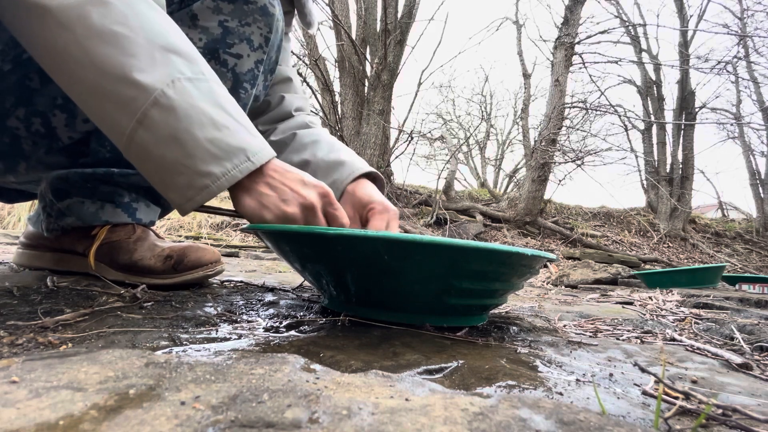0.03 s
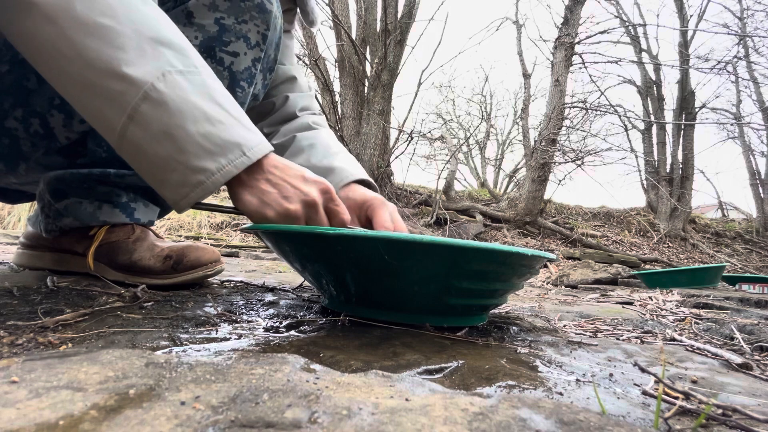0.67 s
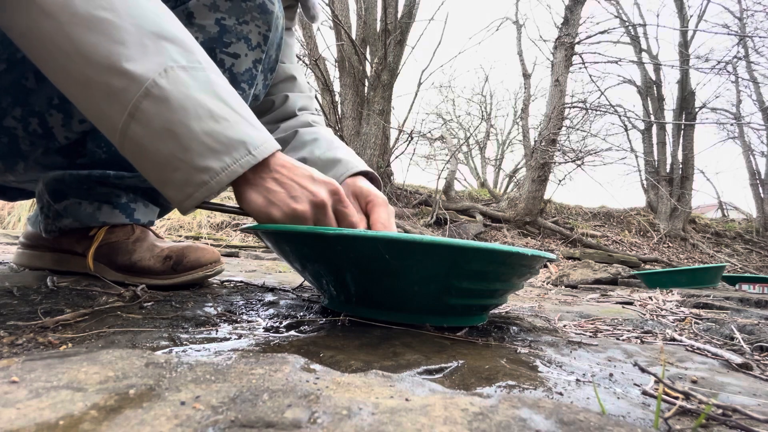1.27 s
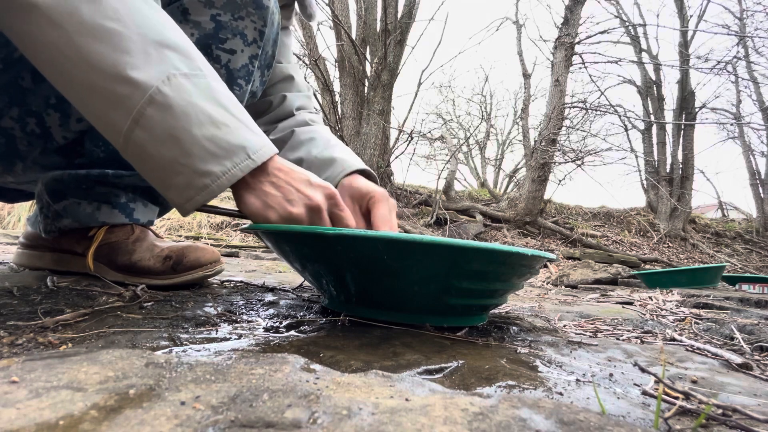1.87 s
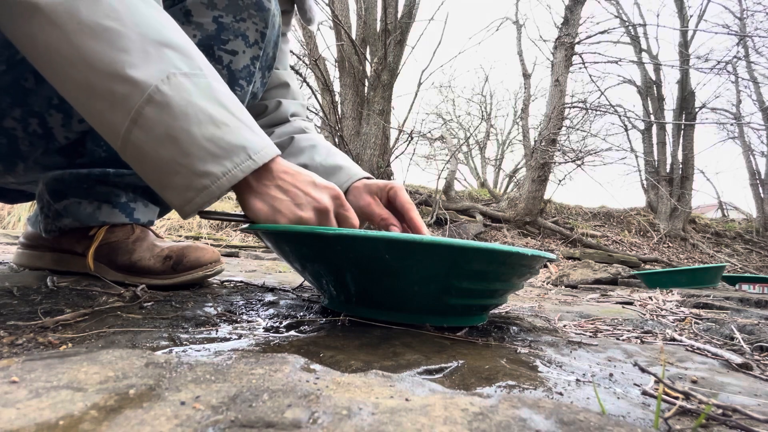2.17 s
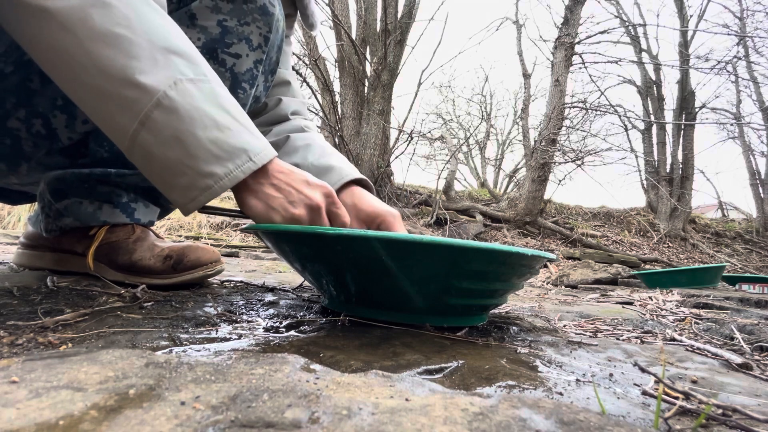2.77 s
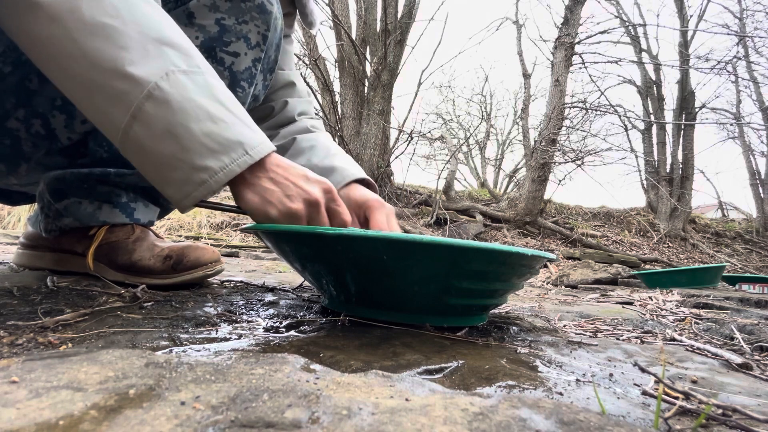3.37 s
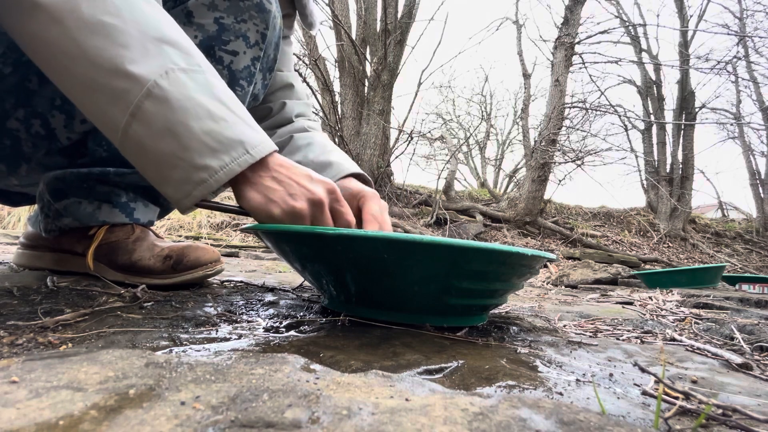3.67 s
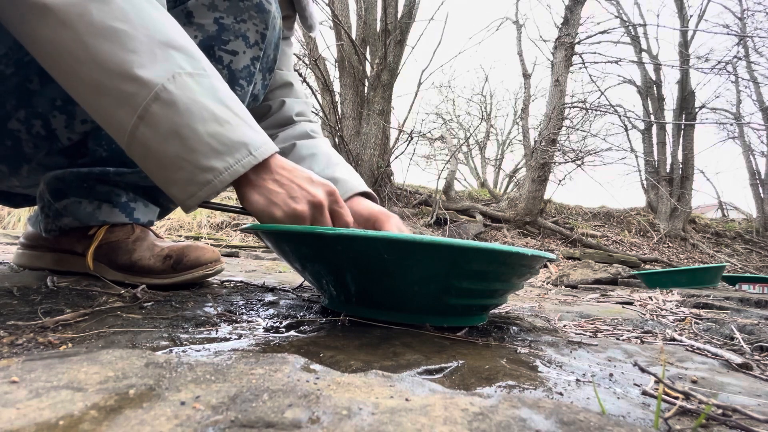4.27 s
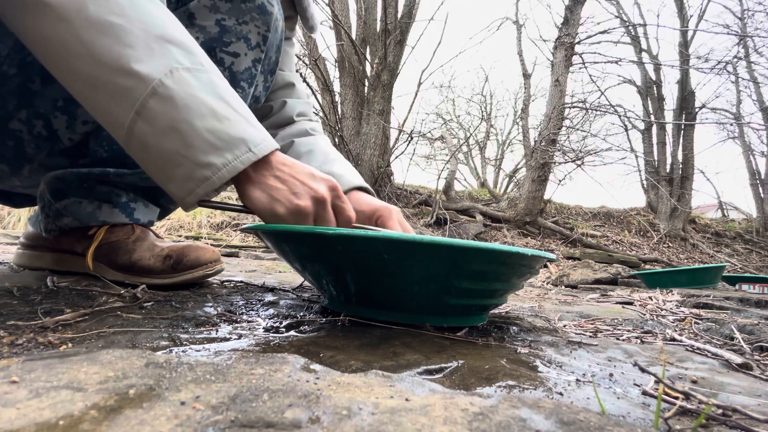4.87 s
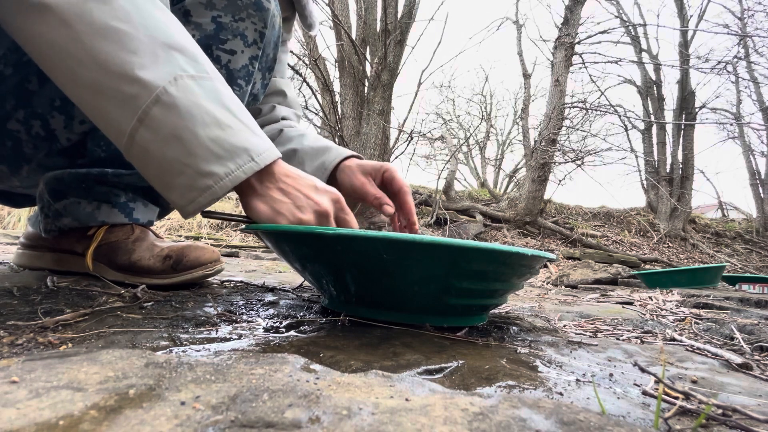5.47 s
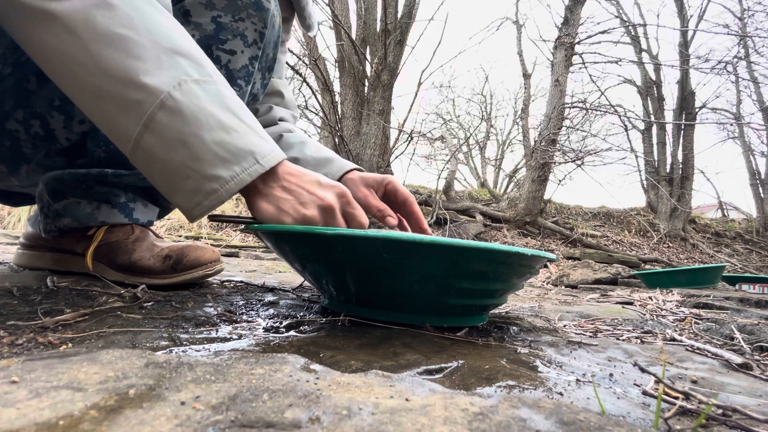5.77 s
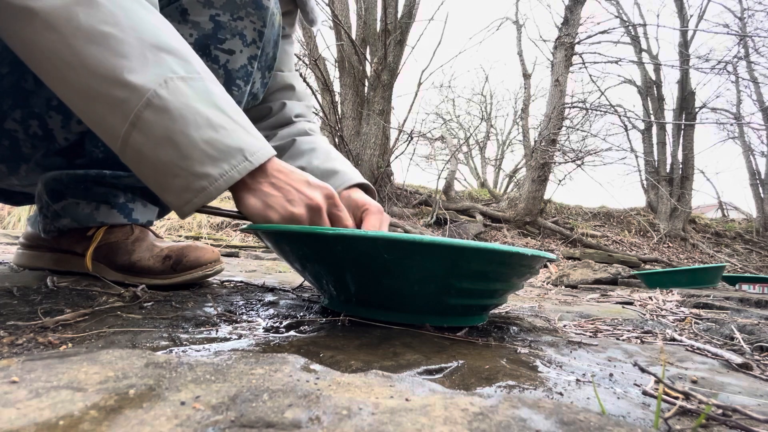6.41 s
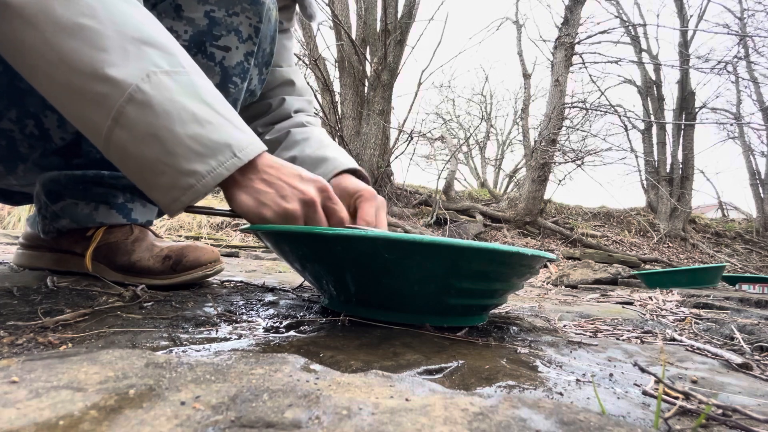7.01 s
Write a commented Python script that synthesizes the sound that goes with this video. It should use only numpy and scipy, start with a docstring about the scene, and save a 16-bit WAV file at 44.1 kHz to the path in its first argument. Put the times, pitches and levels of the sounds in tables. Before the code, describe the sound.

Hands rub and scrub wet gravel in a plastic pan, pebbles clicking, while a heavy vehicle passes behind.

```python
"""Wet gravel in a pan by the road

Two hands rub wet gravel round a plastic pan outdoors: slow strokes and two bursts of quick scrubbing.
Single pebbles click and knock the pan, and one bubble chirps. Behind them a heavy vehicle passes:
its engine drops in pitch, its tyres swell and fade. Two closely spaced microphone ports listen."""
import sys
import numpy as np
from scipy import signal
from scipy.fft import rfft, irfft, next_fast_len
from scipy.io import wavfile
from scipy.ndimage import uniform_filter1d, map_coordinates

SR = 44100
rng = np.random.default_rng(int(sys.argv[2]) if len(sys.argv) > 2 else 0)


def generate_wav(signal):
    """Clip the signal to [-1, 1] and save it as 16-bit WAV at the path in sys.argv[1]."""
    frames = np.transpose(np.atleast_2d(signal))
    scaled = np.clip(frames, -1, 1) * 32767
    pcm = np.round(scaled).astype(np.int16)
    wavfile.write(sys.argv[1], SR, pcm)


N = 319725
TIME = np.arange(N) / SR
SPEED_M_PER_S, CLOSEST_M, ABREAST_S = 26, 19, 2.15  # the vehicle's straight path

# Table levels are relative; the functions set the final balance.
# hand strokes: t/s, level/dB, half length/s, lean (+ sudden start, - sudden end)
STROKES = [(0.164, -48, 0.055, -0.52), (0.33, -48.5, 0.052, -0.35), (0.46, -48.9, 0.037, -0.14),
           (0.605, -45.5, 0.038, -0.12), (0.729, -47.5, 0.04, -0.025), (0.868, -47, 0.067, 0.052),
           (1.087, -56, 0.027, 0.27), (1.173, -47.5, 0.059, 0.32), (1.406, -46.9, 0.047, -0.094),
           (1.517, -51.5, 0.054, 0.63), (1.608, -51, 0.056, -0.045), (1.74, -48.5, 0.097, -0.04),
           (1.911, -48.1, 0.048, -0.06), (1.996, -44.5, 0.033, 0.28), (2.1, -42, 0.034, 0.13),
           (2.189, -46, 0.038, 0.25), (2.296, -43.2, 0.033, 0.2), (2.388, -41, 0.03, 0.18),
           (2.509, -42, 0.038, -0.04), (2.601, -40.5, 0.032, 0.1), (2.705, -42, 0.036, 0.09),
           (2.89, -49, 0.066, -0.15), (3.136, -50.5, 0.059, -0.55), (3.27, -48, 0.049, 0.05),
           (3.458, -48, 0.055, -0.16), (3.596, -49.5, 0.06, 0.39), (3.804, -45.5, 0.055, -0.065),
           (3.981, -46, 0.055, -0.36), (4.14, -46, 0.065, -0.14), (4.322, -51.1, 0.072, 0.2),
           (4.593, -53, 0.11, -0.048), (4.792, -49, 0.041, 0.31), (4.935, -51, 0.071, 0.53),
           (5.133, -54.5, 0.059, 0.24), (5.352, -50.7, 0.065, -0.69), (5.427, -42.3, 0.033, 0.41),
           (5.534, -43, 0.033, 0.19), (5.64, -43.5, 0.036, 0.026), (5.738, -41, 0.035, -0.0099),
           (5.842, -40.5, 0.034, 0.022), (5.94, -42, 0.037, 0.13), (6.043, -40, 0.036, -0.0062),
           (6.142, -50.5, 0.025, -0.077), (6.286, -54.5, 0.091, 0.37), (6.538, -49.5, 0.062, -0.13),
           (6.709, -50, 0.077, -0.11), (6.873, -50.5, 0.046, -0.11), (6.979, -53.1, 0.044, -0.17)]
# gravel that keeps shifting between strokes: t/s, level/dB
SHIFTING = [(0, -60.5), (.9, -59), (1.03, -69), (1.3, -58), (2, -58), (3, -56.5), (4, -56.5), (5.3, -56.5),
            (6.1, -61), (6.45, -66), (7.04, -61), (7.11, -66), (7.25, -71)]
# bright rasp of stone on stone: f/Hz, level/dB
GRIT_SPECTRUM = [(900, -11.5), (1700, -2), (2500, -4.5), (3400, -4), (4400, -4.5), (5200, -7), (6200, -2.5),
                 (7200, -7), (8500, -4), (10400, 1), (11800, -6.5), (12700, -16), (13600, -41),
                 (15500, -31)]
# the pan's dull answer to the rubbing: f/Hz, level/dB
PAN_SPECTRUM = [(150, -14), (400, 3.5), (750, 1.5), (1300, -38), (2500, -33)]
# featured pebbles: t/s, ring level/dB, f/Hz, crack level/dB, crack t60/s
LOUD_PEBBLES = [(.044, -41, 3100, -42, .009), (.448, -35, 2700, -34, .03), (1.086, -38, 6200, -34, .012),
                (1.152, -36, 9900, -29, .009), (1.189, -28, 4950, -31, .009),
                (1.225, -27, 11300, -22, .011), (1.414, -31, 2900, -29, .025),
                (1.425, -33, 5200, -25.5, .016), (2.191, -19, 1500, -32, .009),
                (2.244, -34, 3950, -38, .009), (2.624, -22, 2300, -26, .03),
                (2.733, -30.5, 4350, -34, .009), (2.864, -36, 4300, -35, .02),
                (2.894, -35, 8500, -27, .015), (2.94, -40, 9900, -32, .009), (3.221, -37, 4480, -38, .009),
                (3.588, -27, 6200, -26, .014), (3.936, -31, 3800, -30, .012), (4.652, -35, 6300, -26, .013),
                (6.311, -42, 9900, -34, .009), (6.335, -42, 6300, -34, .009), (6.756, -40, 8500, -30, .012),
                (6.975, -35, 3300, -33, .009), (6.990, -23.5, 1850, -19, .006),
                (6.999, -37, 3550, -42, .009), (7.017, -45, 4300, -36, .009), (7.047, -42, 9500, -36, .009),
                (7.091, -38, 10000, -29, .009)]
# stones that knock the pan: t/s, level/dB
KNOCKS = [(5.383, -27), (5.953, -23)]
# one bubble in the wet gravel: t/s, ring level/dB, starting f/Hz, rise/(Hz/s), t60/s, splash level/dB
BUBBLE = (4.076, -28, 1830, 62000, .066, -43)

# how each part of the vehicle radiates, from -90 deg coming to 90 deg leaving: base level/dB,
# loss per doubling of distance/dB, rear gain/dB, beam gain/dB, beam angle/deg, beam width/deg
RADIATION = {"rumble": (-31, 5.5, 6, 9, -57.5, 27), "exhaust": (-39.5, 7.5, -2, 16, 66.5, 31.5),
             "roar": (-30, 8, -1, 8, 76, 7), "hiss": (-32.5, 4, 5, 6, -62.5, 36),
             "tread": (-37.5, 7.5, 6, 1, 47, 21), "sweep": (-43.5, 4, 5.5, 1, -24, 21),
             "whoosh": (-37.5, 10.5, 3.5, 15, 71.5, 18)}
# engine harmonics: order of the cycle rate, level coming/dB, level abreast/dB, level leaving/dB
ENGINE_ORDERS = [(4, -41.5, -56, -41.5), (5, -38, -35.5, -48.5), (6, -60, -48, -40), (7, -41, -73, -44),
                 (8, -37.5, -53, -43), (10, -48, -47.5, -42.5), (13, -59, -72, -54.5),
                 (16, -49.5, -43.5, -54.5)]
# an order booms where its reflections add up: t/s, order, level/dB, half length/s
BOOMS = [(0.486, 4, -37.5, 0.14), (0.858, 8, -33, 0.42), (1.294, 5, -35, 0.89), (1.51, 10, -32.5, 0.14),
         (2.35, 4, -32.5, 0.48), (2.85, 5, -33, 0.41)]
# low end of the vehicle's body: f/Hz, level/dB
RUMBLE_SPECTRUM = [(22, -42), (38, -27), (55, 1.5), (85, 0), (135, -2.5), (220, -11), (300, -17),
                   (500, -37.5), (1500, -92)]
# exhaust drone: f/Hz, level/dB
EXHAUST_SPECTRUM = [(70, -14), (125, -4.5), (180, 1), (240, -3), (300, -9.5), (420, -43), (900, -82)]
# tyre roar, heard close by: f/Hz, level/dB
ROAR_SPECTRUM = [(150, -17), (300, -7), (450, -4), (560, -6.5), (650, -5), (800, -1), (1200, -11),
                 (2000, -46), (5000, -69)]
# tyre hiss, which carries far: f/Hz, level/dB
HISS_SPECTRUM = [(300, -22.5), (600, -11), (780, -8), (930, 1.5), (1200, -1.5), (1600, -7.5), (1850, -11.5),
                 (2200, -16.5), (3000, -25), (5000, -32.5), (11000, -55), (14000, -81)]
# hum of the tread: f/Hz, level/dB
TREAD_SPECTRUM = [(400, -58), (560, -12), (630, -1.5), (680, 1), (760, -7.5), (1000, -69)]
# midrange sizzle of the tyres: f/Hz, level/dB
SIZZLE_SPECTRUM = [(900, -62), (1300, 4), (1600, 7.5), (1850, 6), (2150, -14), (3000, -48)]
# swells of that sizzle: t/s, level/dB
SIZZLE_LEVEL = [(0, -60), (.3, -51), (.85, -48), (1.3, -58), (2, -47.5), (2.5, -41.5), (2.7, -45),
                (2.86, -38), (3.12, -41), (3.32, -50), (4.1, -44), (5.2, -50.5), (5.85, -46), (6.3, -49),
                (7.25, -50.5)]
# a narrow note from the tread that comes and goes: t/s, f/Hz, level/dB
TREAD_NOTE = [(1.7, 640, -63), (1.83, 651.5, -28.5), (1.97, 665, -43), (2.08, 654, -37), (2.22, 661.5, -41),
              (2.38, 662, -38), (2.55, 660, -41), (2.7, 658, -39.5), (2.88, 612.7, -36), (3.08, 630, -48),
              (3.25, 638, -34.5), (3.42, 649, -37.5), (3.7, 640, -51), (4.35, 638, -49), (4.52, 641, -40.5),
              (5, 645.5, -49), (5.6, 652, -48), (6.3, 646, -65)]

# stereo image of the pan: f/Hz, likeness (0-1), left lead/rad, left minus right/dB
PAN_PORTS = [(700, 0.97, -0.5, -9), (2000, 0.26, -2, 1), (3450, 1, -2, -1.5), (4200, 0.08, -4, -4.5),
             (6380, 0.43, -5.5, -3.5), (7250, 0.37, -2.5, -7.5), (7650, 1, -1.5, 2.5),
             (8570, 0.9, 0.34, -1.5), (10430, 0.95, 3, 0), (11830, 0.84, 7, 0)]
# stereo image of the road: same columns
ROAD_PORTS = [(79.6, 0.96, 0.12, 1.5), (236, 0.88, 0.46, 2), (410, 0.43, 1.75, 0), (630, 0.6, 1.35, -3.5),
              (762, 0.63, 2.45, -5), (948, 0.98, 3.34, -3.5), (1254, 0.66, 2.9, -5),
              (1750, 0.67, 2.05, -4.5), (2330, 0.064, 3.2, 0), (2980, 0.35, 4.47, -3.5)]
# stereo image of the tread's hum and note and the whoosh: same columns
TONE_PORTS = [(640, 0.73, 1.36, 1.5), (805, 0.63, 3.6, 1.5), (937, 1, 2.6, -5)]


def hand_effort(squareness=2.6):
    """How hard the gravel is moved: each stroke swells and lets go, over stones that keep shifting."""
    power = amp(curves(SHIFTING)[0]) ** 2
    for middle, db, half, lean in STROKES:
        since = TIME - middle
        flank_s = half * (1 + np.clip(lean, -.8, .8) * np.sign(since))
        offset = np.abs(since) / flank_s
        near = offset < 3
        power[near] += amp(db) ** 2 * np.exp(-2 * offset[near] ** squareness)
    return np.sqrt(power)


def grit(effort, contacts_per_s=4000, spread_db=.5, sand_db=-4, clump_db=.5, gain_db=5):
    """Countless tiny stone contacts of uneven size over the hiss of wet sand."""
    touch = rng.random((2, N)) < contacts_per_s / SR
    size = amp(spread_db * np.minimum(rng.exponential(size=(2, N)), 5))
    contacts = unit(touch * size * rng.choice([-1, 1], (2, N)))
    sand = amp(sand_db) * rng.standard_normal((2, N))
    stones = coloured(patchy(contacts + sand, depth_db=2.3), GRIT_SPECTRUM)
    return at_ports(stones * effort * amp(gain_db + clump_db * wobble(70)), PAN_PORTS)


def patchy(x, depth_db):
    """Every group of stones has its own colour for a few milliseconds."""
    frames = signal.stft(x, nperseg=256)[2]
    patches = uniform_filter1d(rng.standard_normal(frames.shape[1:]), size=4, axis=0)
    patches = uniform_filter1d(patches, size=3, axis=1)
    return signal.istft(frames * amp(depth_db * unit(patches)), nperseg=256)[1][:, :N]


def pan_body(effort, gain_db=-8):
    """The plastic pan resounds dully under the rubbing stones."""
    return effort * amp(gain_db) * at_ports(noise_pair(PAN_SPECTRUM), PAN_PORTS)


def pebbles(effort, count=280, centre_hz=5200, pitch_spread=.38, small_db=-2, spread_db=2, follow=.7):
    """Loud pebbles, knocks on the pan, and small stones that tumble harder as the hands move."""
    track = np.zeros(N + SR)
    hits = [(s, amp(ring_db) * click(hz, t60=.014) + amp(crack_db) * crack(crack_t60))
            for s, ring_db, hz, crack_db, crack_t60 in LOUD_PEBBLES]
    hits += [(s, amp(db) * click(hz=750, t60=.028)) for s, db in KNOCKS]
    for s, sound in hits:
        track[round(s * SR):][:len(sound)] += sound
    starts = rng.integers(0, N, count)
    for start, pitch, size in zip(starts, rng.standard_normal(count), rng.standard_normal(count)):
        hz = min(centre_hz * np.exp(pitch_spread * pitch), SR / 4)
        push = effort.mean() * (effort[start] / effort.mean()) ** follow
        sound = push * amp(small_db + spread_db * size) * (click(hz, t60=.0083) + crack() / 2)
        track[start:][:len(sound)] += sound
    direct = filtered(track[:N], lambda hz: 1 / (1 + (hz / 12200) ** 40))  # steep high cut
    reflection = np.roll(direct, SR // 1000)  # the pan wall throws back a copy
    return at_ports(np.array([direct, reflection]), PAN_PORTS)


def click(hz, t60):
    """A pebble's hit: three close, quickly damped rings."""
    t = np.arange(SR // 16) / SR
    partials = hz * np.exp(rng.normal(0, .044, (3, 1)))
    return np.sin(2 * np.pi * partials * t).mean(0) * amp(-60 * t / t60)


def crack(t60=.009):
    """The sharp transient when two stones meet; a long one is a crunch."""
    t = np.arange(SR // 16) / SR
    return amp(-60 * t / t60) * rng.standard_normal(len(t)) / 2


def bubble(attack_s=.0017):
    """Trapped air rings and rises in pitch as it nears the surface, with a little splash."""
    s, db, start_hz, rise, t60, splash_db = BUBBLE
    t = np.clip(TIME - s, 0, t60 / 2)
    envelope = amp(-60 * t / t60) * (1 - np.exp(-t / attack_s)) * np.cos(np.pi * t / t60)
    ring = amp(db) * np.sin(2 * np.pi * (start_hz + rise * t / 2) * t)
    return envelope * (ring + amp(splash_db) * noise_pair(GRIT_SPECTRUM))


def vehicle(buffet_db=-13, roar_flutter_db=1.2, hiss_flutter_db=.9):
    """The pass-by: body rumble, engine and exhaust under the roar, hiss and tones of the tyres."""
    distance, bearing = passage()
    buffet = amp(buffet_db) * noise_pair(RUMBLE_SPECTRUM)  # moving air differs from port to port
    low_end = amp(heard_db("rumble")) * (road_noise(RUMBLE_SPECTRUM) + buffet) + engine(bearing)
    drone = amp(heard_db("exhaust")) * road_noise(EXHAUST_SPECTRUM)
    roar = amp(heard_db("roar") + roar_flutter_db * wobble(7)) * road_noise(ROAR_SPECTRUM)
    hiss = amp(heard_db("hiss") + hiss_flutter_db * wobble(5.6)) * road_noise(HISS_SPECTRUM)
    return low_end + drone + roar + hiss + tyre_tones(distance, bearing) + tread_note()


def passage():
    """Distance (m) of the vehicle and its bearing: -1 coming, 0 abreast, 1 leaving."""
    past_m = SPEED_M_PER_S * (TIME - ABREAST_S)
    distance = np.hypot(past_m, CLOSEST_M)
    return distance, past_m / distance


def heard_db(part):
    """Level of one part of the vehicle: it falls with distance and swells as its beam sweeps past."""
    base_db, loss_db, rear_db, beam_db, aim, width = RADIATION[part]
    distance, bearing = passage()
    angle = np.degrees(np.arcsin(bearing))
    beam = np.exp(-((angle - aim) / width) ** 2)
    return base_db - loss_db * np.log2(distance / CLOSEST_M) + rear_db * bearing + beam_db * beam


def engine(bearing, cycle_hz=15.03, fade_db=2, waver=.0028, gain_db=-1):
    """Exhaust orders bend down with the Doppler shift, each fading on its way through the trees."""
    doppler_hz = cycle_hz / (1 + SPEED_M_PER_S / 343 * bearing)
    phase = 2 * np.pi * np.cumsum(doppler_hz * (1 + waver * wobble(8))) / SR
    tone = np.zeros(N)
    for order, *levels in ENGINE_ORDERS:
        steady = amp(np.interp(bearing, (-1, 0, 1), levels) + fade_db * wobble(3.046))
        boom = sum(amp(db) * np.exp(-((TIME - s) / half) ** 2)
                   for s, boom_order, db, half in BOOMS if boom_order == order)
        tone += np.hypot(steady, boom) * np.sin(order * phase + rng.uniform(0, 2 * np.pi))
    return amp(gain_db) * np.sqrt(2) * tone * amp([[.7], [-.7]])  # a touch to the left


def tyre_tones(distance, bearing, hum_flutter_db=1.3, whoosh_flutter_db=2, climb_per_m=.0041):
    """The tread hums and sizzles; reflections reinforce two bands of tyre noise, a sweep and a whoosh."""
    hum = amp(heard_db("tread") + hum_flutter_db * wobble(6)) * noise_pair(TREAD_SPECTRUM)
    sizzle = amp(curves(SIZZLE_LEVEL)[0]) * coloured(rng.standard_normal(N), SIZZLE_SPECTRUM)
    sweep_hz = 750 * np.exp(climb_per_m * distance * bearing)  # climbs all along the road
    sweep = amp(heard_db("sweep")) * moving_band(sweep_hz, relative_width=.12)
    whoosh_hz = 796 * (distance / CLOSEST_M) ** .14  # lowest abreast
    whoosh_gain = amp(heard_db("whoosh") + whoosh_flutter_db * wobble(12))
    whoosh = whoosh_gain * np.array([moving_band(whoosh_hz, relative_width=.058) for _ in range(2)])
    return at_ports(hum + whoosh, TONE_PORTS) + sizzle + sweep


def tread_note(jitter=.036, flutter_db=3.1, wobbles_per_s=75):
    """The tread blocks sing a rough note that wavers in pitch and strength."""
    hz, db = curves(TREAD_NOTE)
    phase = 2 * np.pi * np.cumsum(hz * (1 + jitter * wobble(wobbles_per_s))) / SR
    note = np.sqrt(2) * amp(db + flutter_db * wobble(wobbles_per_s)) * np.sin(phase)
    return at_ports(np.array([note, np.zeros(N)]), TONE_PORTS)


def road_noise(spectrum):
    """Stereo noise of rms 1 from the direction of the road."""
    return unit(at_ports(noise_pair(spectrum), ROAD_PORTS))


def moving_band(centre_hz, relative_width):
    """A narrow band of noise, rms 1, that follows a moving centre."""
    hz, t, frames = signal.stft(rng.standard_normal(N), SR, nperseg=2048)
    centre = np.interp(t, TIME, centre_hz)
    band = np.exp(-.5 * ((hz[:, None] / centre - 1) / relative_width) ** 2) / np.sqrt(centre)
    return unit(signal.istft(frames * band, SR, nperseg=2048)[1][:N])


def at_ports(pair, ports):
    """Spread a mid and a side signal over the two ports, with a phase lead and a level tilt."""
    size = next_fast_len(N + SR // 4)
    likeness, lead, tilt_db = along(ports, np.fft.rfftfreq(size, 1 / SR))
    width = np.arccos(np.clip(likeness, 0, 1)) / 2
    mid, side = rfft(pair, size)
    sign = np.array([[1], [-1]])
    stereo = np.cos(width) * mid + sign * np.sin(width) * side
    return irfft(stereo * amp(sign * tilt_db / 2) * np.exp(.5j * sign * lead), size)[:, :N]


def noise_pair(spectrum):
    """Two independent noises of one colour, at rms 1."""
    return coloured(rng.standard_normal((2, N)), spectrum)


def coloured(x, spectrum):
    """x through an EQ curve, at rms 1."""
    return unit(filtered(x, lambda hz: amp(along(spectrum, hz)[0])))


def filtered(x, response):
    """x through a frequency response."""
    size = next_fast_len(N + SR // 4)
    return irfft(rfft(x, size) * response(np.fft.rfftfreq(size, 1 / SR)), size)[..., :N]


def wobble(rate):
    """A smooth random curve with rate knots a second."""
    return map_coordinates(rng.standard_normal(int(N * rate / SR) + 4), [TIME * rate])


def along(rows, hz):
    """Each column of a table over f/Hz, read on a log axis."""
    f, *columns = np.transpose(rows)
    return [np.interp(np.log(hz + 1), np.log(f + 1), column) for column in columns]


def curves(rows):
    """Each column of a table over t/s, one value per sample."""
    s, *columns = np.transpose(rows)
    return [np.interp(TIME, s, column) for column in columns]


def amp(db):
    """Decibels to gain."""
    return 10 ** (np.asarray(db) / 20)


def unit(x):
    """Scale to rms 1."""
    return x / np.sqrt(np.mean(x ** 2) + 1e-20)


def scene():
    """The pan up front, the road behind."""
    effort = hand_effort()
    return grit(effort) + pan_body(effort) + pebbles(effort) + bubble() + vehicle()


def record(dry):
    """A brick-wall high cut takes off the very top."""
    return filtered(dry, lambda hz: hz < 15800)


dry = scene()
out = record(dry)
generate_wav(out)
```